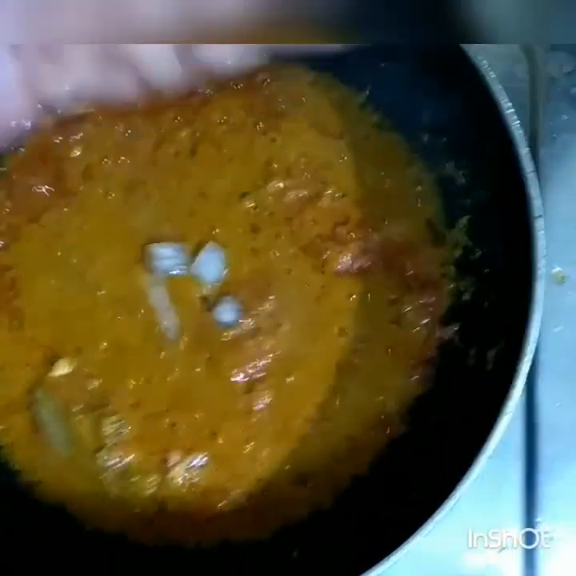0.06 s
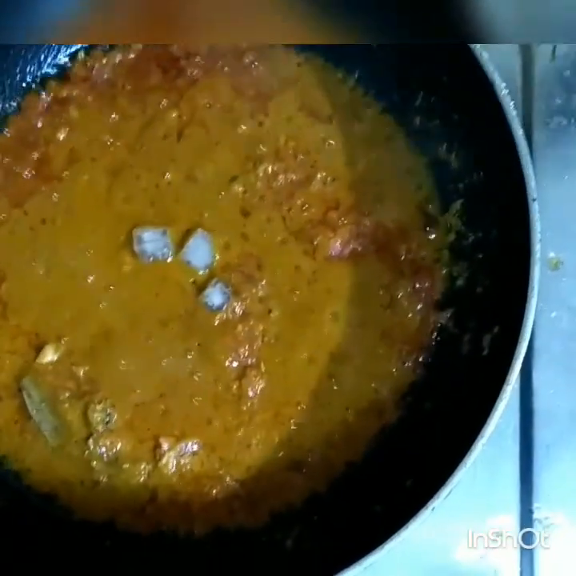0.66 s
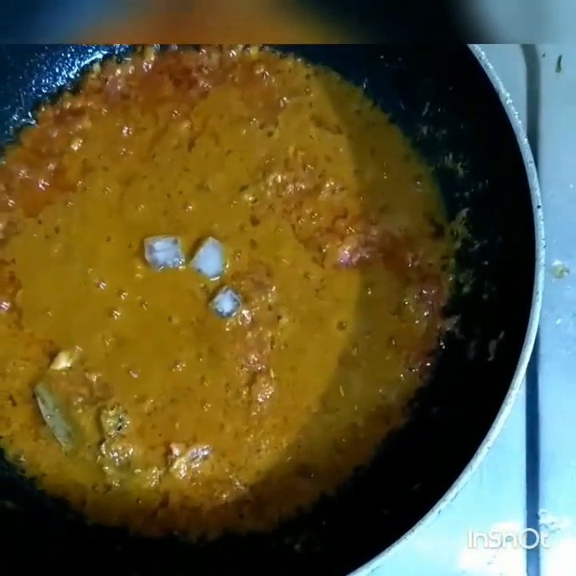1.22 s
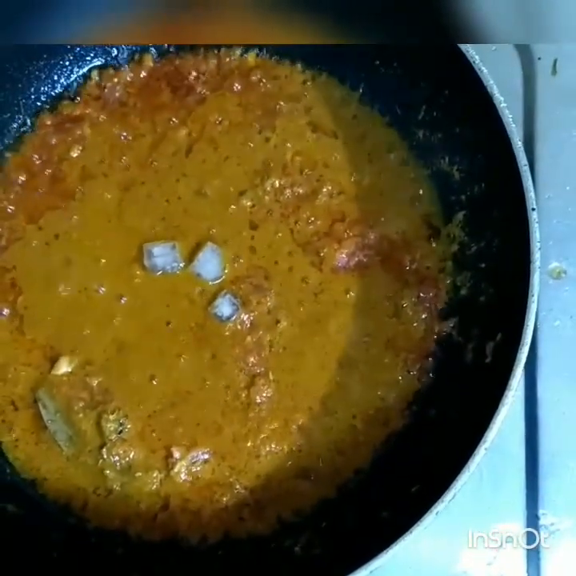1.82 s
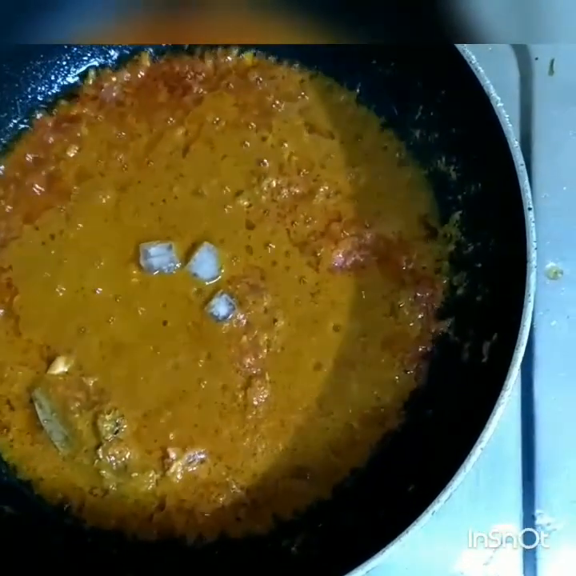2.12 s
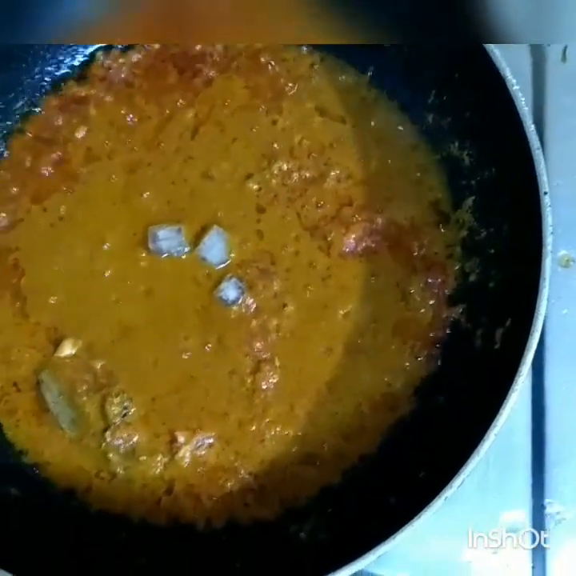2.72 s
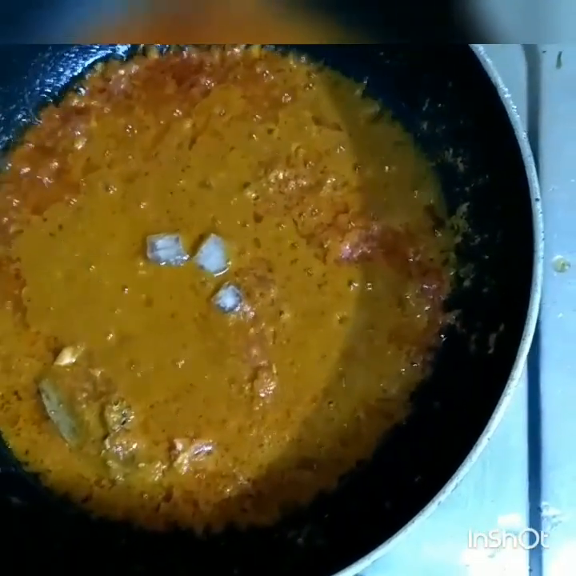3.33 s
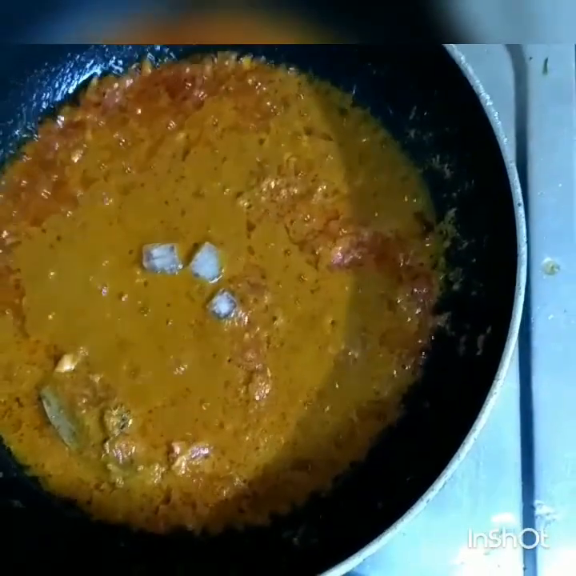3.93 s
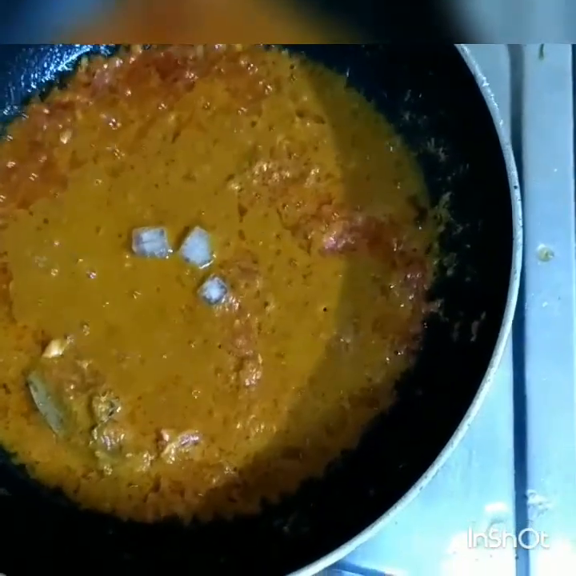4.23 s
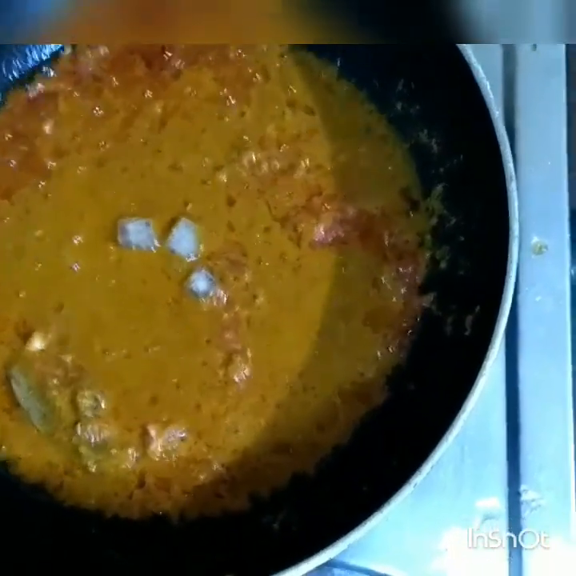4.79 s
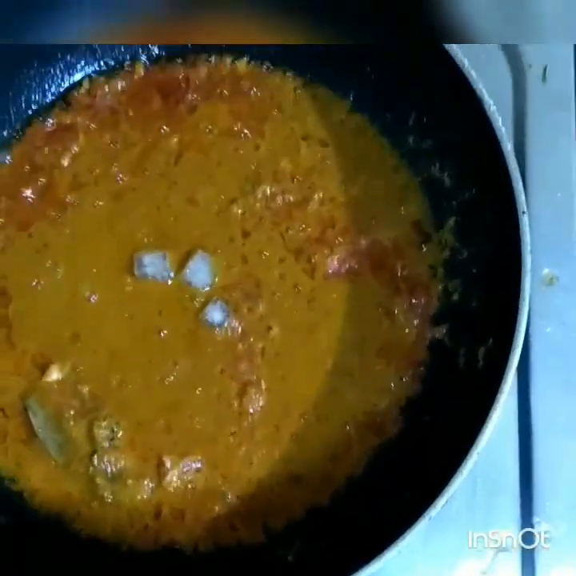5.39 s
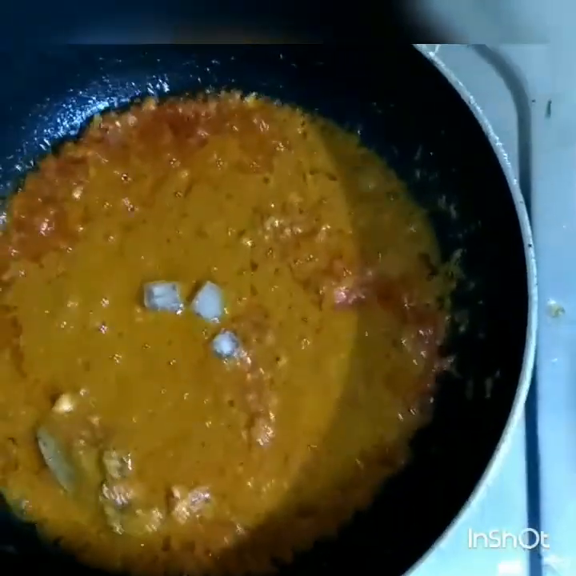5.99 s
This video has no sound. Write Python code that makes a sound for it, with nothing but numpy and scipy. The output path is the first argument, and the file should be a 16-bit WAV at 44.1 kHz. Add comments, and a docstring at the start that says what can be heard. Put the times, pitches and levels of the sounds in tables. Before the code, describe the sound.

Close above a stove in a small kitchen, several hard lumps click into a pan of gently sizzling gravy. Bubbles spit and plop over the burner's low purr while the worktop takes a few soft bumps. A jar's lid rasps and knocks, the contents rattle brightly, and the jar lands hard. The sizzle dips after the loud sounds and creeps back, ending with a dull thud and slight microphone rumble.

```python
"""A small kitchen, just above the stove: a gas flame flutters under a pan of gravy, whose steam bubbles
sizzle, spit and plop. Hard lumps, perhaps rock salt, click as they drop from a hand; their jar is scraped
by its lid, knocked, shaken and set down on a worktop that takes a few dull bumps. Bubbles are puffs of
noise through a cavity; contacts are flurries of tiny impacts that ring a body. The hand-held camera
rumbles as it shifts, and a gain control ducks after each loud sound and creeps back."""
import sys
import numpy as np
from scipy import signal
from scipy.fft import rfft, irfft, next_fast_len
from scipy.io import wavfile
from scipy.ndimage import uniform_filter1d, map_coordinates

SR = 44100
rng = np.random.default_rng(int(sys.argv[2]) if len(sys.argv) > 2 else 0)


def dump(signal):
    """Clip the signal to [-1, 1] and save it as 16-bit WAV at the path in sys.argv[1]."""
    limited = np.clip(np.atleast_2d(signal).T, -1, 1)
    pcm = np.round(limited * 32767).astype(np.int16)
    wavfile.write(sys.argv[1], SR, pcm)


N = 271215


def amp(db):
    """Decibels to gain."""
    return 10 ** (np.asarray(db) / 20)


def unit(x):
    """Scale to rms 1."""
    return x / np.sqrt(np.mean(np.abs(x) ** 2) + 1e-20)


def along(points, hz):
    """Read a curve of (frequency [Hz], value) points on a log-frequency axis."""
    freqs, values = np.transpose(points)
    return np.interp(np.log(hz + 1), np.log(freqs + 1), values)


def wobble(rate):
    """A smooth random modulator, rate knots a second."""
    knots = rng.standard_normal(int(N * rate / SR) + 4)
    return map_coordinates(knots, [np.arange(N) * rate / SR])


def envelope(rise, hold, t60):
    """Half a second of attack, hold and release, all set in seconds."""
    t = np.arange(SR // 2) / SR
    return np.minimum(t / rise, 1) * amp(-60 * np.maximum(t - rise - hold, 0) / t60)


def grains(n, rate, spread_db):
    """Tiny random impulses of uneven size, about rate a second, at rms 1."""
    size = amp(spread_db * np.clip(rng.standard_normal(n), -3, 3))
    polarity = np.sign(rng.standard_normal(n))
    fires = rng.random(n) < rate / SR
    return unit(size * polarity * fires)


def filtered(x, response):
    """Filter x by a gain given as a function of frequency."""
    m = next_fast_len(len(x) + SR // 4)
    return irfft(rfft(x, m) * response(np.fft.rfftfreq(m, 1 / SR)), m)[:len(x)]


def coloured(x, eq):
    """Shape x with an EQ curve of (frequency [Hz], gain [dB]), at rms 1."""
    return unit(filtered(x, lambda hz: amp(along(eq, hz))))


def resonate(x, gain_db):
    """Send x through a minimum-phase EQ of unit power, which rings only after the blow."""
    m = 2 * len(x)
    magnitude = unit(amp(gain_db(np.fft.rfftfreq(m, 1 / SR))))
    cepstrum = irfft(np.log(magnitude + 1e-6))
    fold = np.r_[1, np.full(m // 2 - 1, 2), np.zeros(m // 2)]  # onto positive time
    response = np.exp(rfft(cepstrum * fold))
    return irfft(rfft(x, m) * response)[:len(x)]


def add(track, s, sound):
    """Mix a sound into a track at s seconds."""
    part = track[round(s * SR):][:len(sound)]
    part += sound[:len(part)]


def shifted(cues, late, db, bass_db=0, treble_db=0):
    """The same contacts, offset in time [s], level, bass and treble."""
    return np.asarray(cues) + [late, db, bass_db, treble_db]


def contacts(cues, swell, eq, modes, rate, spread_db, ripple_db, detune=0):
    """Each contact is a flurry of tiny impacts that swells, dies away and rings a well-damped body."""
    track = np.zeros(N)
    for s, db, bass_db, treble_db in cues:
        # a heavy contact drives the low resonances, a glancing one the high
        tilt = [(1000, bass_db), (3200, bass_db / 2), (6200, 0), (13000, treble_db)]
        # each spot that is touched favours its own set of minor modes
        minor_db = ripple_db * rng.uniform(-1, 1, size=190)
        minor_hz = np.linspace(0, SR / 2, len(minor_db))
        # a changing grip pulls the resonances up or down
        stretch = 1 + detune * rng.uniform(-1, 1)

        def colour_db(hz):
            pulled = hz * stretch
            peaks = sum(boost / (1 + (2 * (pulled - centre) / width) ** 2)
                        for centre, width, boost in modes)
            return along(eq, pulled) + peaks + along(tilt, hz) + np.interp(hz, minor_hz, minor_db)

        flurry = swell * grains(len(swell), rate, spread_db)
        add(track, s, amp(db) * resonate(flurry, colour_db))
    return track


# short decay of the room: (frequency [Hz], t60 [s])
ROOM_DECAY = [(200, .24), (2000, 0.14), (7000, 0.1), (15000, 0.16)]


def kitchen_reverb(x):
    """The room's tail, each frequency dying at its own speed."""
    hz, t, noise = signal.stft(rng.standard_normal(SR // 2), SR, nperseg=256)
    decay = amp(-60 * t / along(ROOM_DECAY, hz)[:, None])
    tail = signal.istft(noise * decay, SR, nperseg=256)[1]
    tail *= np.arange(len(tail)) / SR > .005  # pre-delay
    return signal.fftconvolve(x, tail / np.linalg.norm(tail))[:N]


# low purr of the burner: (frequency [Hz], gain [dB])
FLAME_EQ = [(20, -34), (35, -12.5), (62, -6), (92, 8), (120, 3), (160, -3), (205, -17.5), (260, -11.5),
            (305, -3), (390, -23.5), (490, -20), (650, -20.5), (1200, -34.5)]


def gas_flame():
    """The flame flutters under the pan: a bed of low noise with a wavering level."""
    return amp(-59.5 + 2.1 * wobble(14)) * coloured(rng.standard_normal(N), FLAME_EQ)


# shifts of the hand: (time [s], hold [s], level [dB])
HAND_SHIFTS = [(0, .08, -48.5), (1.63, .04, -57), (1.89, .14, -55), (4.95, .02, -59), (5.72, .04, -48),
               (5.82, .04, -51), (5.94, .09, -46), (6.085, .02, -47)]
# bassy handling noise: (frequency [Hz], gain [dB])
HANDLING_EQ = [(20, -33.5), (45, -12), (68, -12), (82, 11), (96, 7), (125, -4), (200, -21), (500, -42),
               (1500, -90)]


def handling_rumble():
    """The camera rumbles whenever the hand that holds it shifts."""
    motion = np.zeros(N)
    for s, hold, db in HAND_SHIFTS:
        add(motion, s, amp(db) * envelope(rise=.02, hold=hold, t60=.3))
    return motion * coloured(rng.standard_normal(N), HANDLING_EQ)


# the fizz bed and its bright crackle: (frequency [Hz], gain [dB])
FIZZ_EQ = [(290, -42.5), (500, -9.5), (545, -12), (958, -12), (1060, -14.5), (1420, -12.5), (2150, -13.5),
           (4060, -6.5), (10100, -3.5), (13700, -0.5), (15800, -2)]
CRACKLE_EQ = [(500, -24), (2500, -13), (5000, -5), (10000, -1), (15800, 0)]


def sizzle():
    """Countless steam bubbles burst along the hot rim: fine fizz with sparser crackle on top."""
    fizz = amp(-44.1 + .7 * wobble(9)) * coloured(grains(N, rate=9000, spread_db=3), FIZZ_EQ)
    crackle = amp(-51.5 + 3 * wobble(21)) * coloured(grains(N, rate=240, spread_db=5), CRACKLE_EQ)
    return fizz + crackle


def burst(swell, db, pitch_hz, q):
    """A puff of noise coloured by a cavity of sharpness q, as when a bubble opens."""
    cavity_db = lambda hz: -20 * np.log10(1 + (q * (hz / pitch_hz - pitch_hz / (hz + 1))) ** 2)
    puff = amp(db) * swell * rng.standard_normal(len(swell))
    return resonate(puff, cavity_db)


# sharp spits and hissing jets: (time [s], level [dB], pitch [Hz])
RIM_SPITS = [(.2955, -27, 7500), (1.449, -27.5, 13000), (1.8075, -27.5, 13000), (2.378, -28, 10600),
             (2.6158, -27, 12500), (3.2713, -30, 8650), (4.357, -25.5, 7200), (4.51, -28, 12000),
             (5.153, -29.5, 12000), (5.611, -27.5, 13000), (5.777, -28, 12000)]
STEAM_JETS = [(.365, -45, 5600), (.8, -45, 6800), (.85, -45, 4850), (1.326, -39.5, 6800),
              (1.562, -33, 14400), (1.58, -38, 7050), (1.71, -49, 4000), (1.92, -44, 5800),
              (2.585, -41, 5500), (2.81, -41, 6800), (5.44, -45, 5700)]
# low plops, and the hollow tone of the worktop bumps near 660 Hz: (time [s], level [dB], pitch [Hz])
PLOPS_AND_BUMP_TONES = [(1.035, -55, 285), (1.205, -51, 280), (1.245, -55, 1130), (1.68, -51, 300),
                        (1.76, -53, 650), (1.83, -58, 560), (1.97, -59, 500), (2.55, -58, 310),
                        (2.745, -53, 1280), (2.77, -51, 720), (2.875, -56, 490), (3.04, -55, 305),
                        (5.015, -59, 315), (5.435, -63.5, 660), (5.72, -55, 660), (5.775, -43, 667),
                        (5.912, -43, 600)]
STEAM_Q, LOW_Q = 2.6, 4  # sharpness of the resonance


def bubbles_and_bump_tones():
    """Single bubbles spit, let off steam or plop; the same low burst gives the bumps a hollow tone."""
    track = np.zeros(N)
    spit = envelope(rise=.0001, hold=0, t60=.007)
    jet = envelope(rise=.002, hold=0, t60=.2)
    low = envelope(rise=.012, hold=.006, t60=.3)
    layers = (RIM_SPITS, spit, STEAM_Q), (STEAM_JETS, jet, STEAM_Q), (PLOPS_AND_BUMP_TONES, low, LOW_Q)
    for cues, swell, q in layers:
        for s, db, pitch_hz in cues:
            add(track, s, burst(swell, db, pitch_hz, q))
    # small bubbles at random: the longer the hiss, the softer it is
    for when, length, softness, pitch in rng.random(size=(44, 4)):
        hiss = envelope(rise=.001, hold=0, t60=.015 * 14 ** length)
        db = -37.5 - 11 * length - 5 * softness
        add(track, when * N / SR, burst(hiss, db, 5200 * 2.6 ** pitch, STEAM_Q))
    # a faint simmer of plops, spread over 1.1 octaves
    for when, softness, pitch in rng.random(size=(12, 3)):
        add(track, when * N / SR, burst(low, -62 - 5 * softness, 280 * 2 ** (1.1 * pitch), LOW_Q))
    return track


# dull bumps: (time [s], level [dB], bass [dB])
WORKTOP_BUMPS = [(1.153, -36.5, 24), (1.742, -38, 29), (1.815, -52, 28), (2.738, -50, 10), (5.775, -45, 8),
                 (5.822, -45, 6), (5.935, -26.5, 8)]
# the worktop's boxy tone: (frequency [Hz], gain [dB])
WORKTOP_EQ = [(30, -34), (60, -17), (120, -15), (200, -14), (290, -1), (450, -11), (750, -11), (1000, -14),
              (1400, -12.5), (2200, -14), (3500, -13.5), (5000, -17), (6000, -43)]
# its resonances: (frequency [Hz], width [Hz], boost [dB])
WORKTOP_MODES = [(281, 110, 5), (690, 207, 7)]


def worktop_bumps():
    """Something soft touches the worktop, then settles with its full weight."""
    worktop = dict(eq=WORKTOP_EQ, modes=WORKTOP_MODES, rate=3500, spread_db=2.5, ripple_db=1.5)
    treble_db = -12
    blows = [(s, db, bass_db, treble_db) for s, db, bass_db in WORKTOP_BUMPS]
    touch_cues = shifted(blows, late=-.035, db=-15, bass_db=22)
    touches = contacts(touch_cues, envelope(rise=.025, hold=0, t60=.16), **worktop)
    thuds = contacts(blows, envelope(rise=.012, hold=.006, t60=.18), **worktop)
    return touches + thuds


# strokes of the lid: (time [s], level [dB], bass [dB], treble [dB])
LID_STROKES = [(3.168, -41, 8, -10), (3.208, -41.5, 10, -10), (3.285, -28.7, -2, -4),
               (3.442, -26.3, -2.5, -7), (3.9, -54, 14, 0), (4.047, -32, 18, 8)]
# its midrange rasp: (frequency [Hz], gain [dB])
LID_EQ = [(150, -38), (300, -18), (450, -7), (750, -18), (1000, -5), (1500, -5), (2400, -7), (4200, -7),
          (4600, -15), (7600, -17.5), (8300, -28.5), (15000, -29)]
# its resonances: (frequency [Hz], width [Hz], boost [dB])
LID_MODES = [(1070, 120, 11), (1510, 150, 12), (1800, 110, 7), (2150, 140, 9), (2630, 130, 9),
             (3030, 120, 7), (3400, 200, 8.5), (4170, 180, 7.5)]


def lid_scrapes():
    """The lid rubs on the jar; each stroke ends in a lighter, brighter skid."""
    lid = dict(eq=LID_EQ, modes=LID_MODES, rate=3600, spread_db=4, ripple_db=3.5, detune=.025)
    strokes = contacts(LID_STROKES, envelope(rise=.013, hold=.01, t60=.26), **lid)
    skid_cues = shifted(LID_STROKES, late=.042, db=-11, bass_db=-9, treble_db=3)
    skids = contacts(skid_cues, envelope(rise=.01, hold=.006, t60=.11), **lid)
    return strokes + skids


# lid against rim: (time [s], level [dB], bass [dB], treble [dB])
LID_KNOCK = (3.3976, -16.5, 3.5, -10)
# hollow tone of the jar's rim: (frequency [Hz], gain [dB])
RIM_EQ = [(150, -35), (400, -8.5), (750, -10), (1000, 8.5), (1250, -15), (1600, 2.5), (2100, -3),
          (2900, -20.5), (4100, -9.5), (4600, -27.5), (12000, -39)]
# its resonances: (frequency [Hz], width [Hz], boost [dB])
RIM_MODES = [(965, 130, 11), (1520, 90, 7), (1730, 70, 5), (2062, 110, 6)]


def lid_knock():
    """The lid knocks on the jar's rim and falls back on it once."""
    rim = dict(eq=RIM_EQ, modes=RIM_MODES, rate=12000, spread_db=2, ripple_db=3)
    knock = contacts([LID_KNOCK], envelope(rise=.0004, hold=0, t60=.075), **rim)
    rebound_cue = shifted([LID_KNOCK], late=.02, db=-10, bass_db=-10)
    rebound = contacts(rebound_cue, envelope(rise=.002, hold=0, t60=.072), **rim)
    return knock + rebound


# one shake forth, one back: (time [s], level [dB], bass [dB], treble [dB])
JAR_SHAKES = [(3.686, -17.8, 4, 6), (3.741, -20.3, 0, 3)]
# bright rattle of salt on the jar's wall: (frequency [Hz], gain [dB])
RATTLE_EQ = [(300, -38), (800, -30), (1100, -10.5), (1700, -14), (2050, -21), (2400, -16), (3200, -16),
             (4000, -3), (4700, -11), (5600, -3), (7200, -5), (8800, -1.5), (10200, -14), (13000, -2),
             (15800, -11)]
# its resonances: (frequency [Hz], width [Hz], boost [dB])
RATTLE_MODES = [(1093, 170, 10), (1780, 100, 6), (3424, 70, 9), (4064, 70, 7), (5206, 110, 14),
                (5728, 140, 15), (6130, 140, 10), (6821, 70, 9), (8000, 70, 6), (8425, 100, 8),
                (9065, 70, 5), (12760, 160, 7)]
RING_HZ, RING_DB = 2697, -50  # the jar's longest ring


def shaken_salt():
    """At each turn the salt hits the jar's wall, then slides along it; one wall mode sings on."""
    wall = dict(eq=RATTLE_EQ, modes=RATTLE_MODES, rate=9000, spread_db=1.5, ripple_db=3)
    hits = contacts(JAR_SHAKES, envelope(rise=.006, hold=.008, t60=.22), **wall)
    slide_cues = shifted(JAR_SHAKES, late=.024, db=-5.5, bass_db=-4, treble_db=1.5)
    slides = contacts(slide_cues, envelope(rise=.014, hold=.004, t60=.36), **wall)
    swell = envelope(rise=.01, hold=0, t60=.9)
    ring = amp(RING_DB) * swell * np.sin(2 * np.pi * RING_HZ * np.arange(len(swell)) / SR)
    track = hits + slides
    add(track, JAR_SHAKES[0][0], ring)
    return track


# the salt's first rattle as the jar lands: (time [s], level [dB], bass [dB], treble [dB])
JAR_LANDING = (4.0998, -14.5, -.5, -2.5)
# hard clack of the jar: (frequency [Hz], gain [dB])
JAR_EQ = [(120, -68), (200, -32.5), (366, -13), (520, -18), (1020, -7.5), (1300, -11), (1700, -4),
          (2000, -6), (2400, 0), (2890, -6), (3400, 1), (4080, -3), (5200, -5), (6450, -3), (13700, -3.5),
          (15800, -5)]
# its resonances: (frequency [Hz], width [Hz], boost [dB])
JAR_MODES = [(940, 130, 8), (1490, 110, 12), (2590, 60, 6), (3080, 80, 8), (3483, 70, 5), (4264, 90, 5),
             (5846, 80, 9), (6094, 60, 5), (7838, 80, 7)]


def jar_landing():
    """The jar cracks down on the worktop; the salt hops, each time weaker and brighter."""
    jar = dict(eq=JAR_EQ, modes=JAR_MODES, rate=25000, spread_db=5.5, ripple_db=3)
    crack_cue = shifted([JAR_LANDING], late=0, db=10.5, bass_db=11, treble_db=-7)
    crack = contacts(crack_cue, envelope(rise=.0003, hold=0, t60=.016), **jar)
    hop_cues = [shifted(JAR_LANDING, late=.049 * hop, db=-1.2 * hop, bass_db=-.7 * hop, treble_db=5 * hop)
                for hop in range(3)]
    hops = contacts(hop_cues, envelope(rise=.006, hold=.005, t60=.37), **jar)
    return crack + hops


# dropping lumps: (time [s], level [dB], bass [dB], treble [dB], hiss relative to the click [dB])
LUMP_CLICKS = [(.072, -28, -18, -13, -12), (.1138, -14.5, 3, 2, -17), (.175, -19.5, -23, -4, -23),
               (.2334, -13.5, -46, 13, -20)]
# brittle tone of a lump: (frequency [Hz], gain [dB])
LUMP_EQ = [(280, -14), (520, -25), (950, -2), (1750, -2.5), (2450, -10.5), (3300, -1), (4900, -8.5),
           (6500, -1.5), (9000, -6), (12000, -8.5), (14000, 0), (15800, -11.5)]
# its resonances: (frequency [Hz], width [Hz], boost [dB])
LUMP_MODES = [(1130, 200, 3), (4390, 260, 11), (5550, 380, 12), (6480, 350, 11), (7400, 250, 3.5),
              (8440, 330, 10), (8820, 250, 6), (10880, 380, 10)]


def falling_lumps():
    """Every lump grazes its neighbour and strikes; a short splashy hiss follows each click."""
    lump = dict(eq=LUMP_EQ, modes=LUMP_MODES, rate=28000, spread_db=5.5, ripple_db=2)
    clicks = [row[:-1] for row in LUMP_CLICKS]
    graze_cues = shifted(clicks, late=-.008, db=-15, bass_db=-16, treble_db=4)
    hiss_cues = [shifted(click, late=.008, db=hiss_db) for *click, hiss_db in LUMP_CLICKS]
    grazes = contacts(graze_cues, envelope(rise=.0005, hold=0, t60=.035), **lump)
    strikes = contacts(clicks, envelope(rise=.0006, hold=.001, t60=.022), **lump)
    hisses = contacts(hiss_cues, envelope(rise=.002, hold=.006, t60=.16), **lump)
    return grazes + strikes + hisses


def scene():
    """Mono mix: salt, jar, bumps and bubbles feed the reverb; sizzle, flame and rumble stay dry."""
    salt_and_jar = falling_lumps() + lid_scrapes() + lid_knock() + shaken_salt() + jar_landing()
    spot_effects = salt_and_jar + worktop_bumps() + bubbles_and_bump_tones()
    room = amp(-7.5) * kitchen_reverb(spot_effects)
    bed = sizzle() + gas_flame() + handling_rumble()
    return (spot_effects + room + bed)[None]


def gain_control(x, threshold_db, recovery_db_per_s, delay_s, ramp_s):
    """Peaks over the threshold duck the gain after a delay; it then creeps back."""
    t = np.arange(N) / SR
    level_db = 10 * np.log10(np.abs(uniform_filter1d(x ** 2, size=110)) + 1e-12)
    over_db = np.maximum(level_db - threshold_db, 0)
    recovery_db = recovery_db_per_s * t
    cut_db = np.maximum.accumulate(over_db + recovery_db) - recovery_db
    # the gain glides: a running mean over the ramp time
    lost = np.cumsum(1 - amp(-cut_db)) / SR
    duck = (np.interp(t - delay_s, t, lost) - np.interp(t - delay_s - ramp_s, t, lost)) / ramp_s
    return x * (1 - duck)


def record(dry):
    """Master chain: automatic gain control, then a brick-wall low-pass."""
    ridden = gain_control(dry[0], threshold_db=-32, recovery_db_per_s=5.5, delay_s=.099, ramp_s=.12)
    return filtered(ridden, lambda hz: hz < 15900)[None]


dry = scene()
out = record(dry)
dump(out)
```